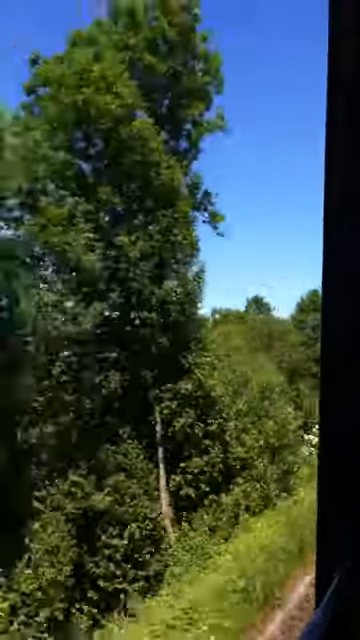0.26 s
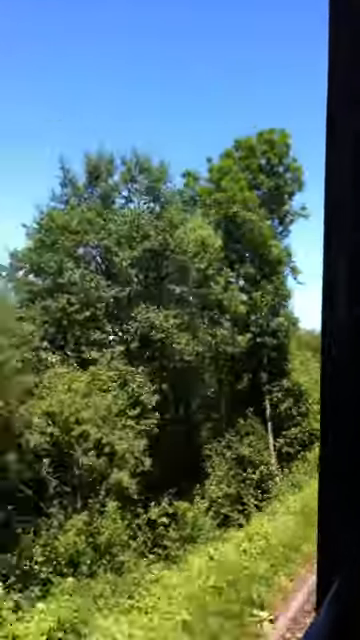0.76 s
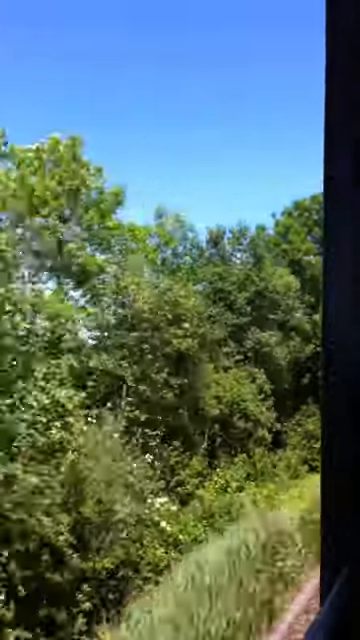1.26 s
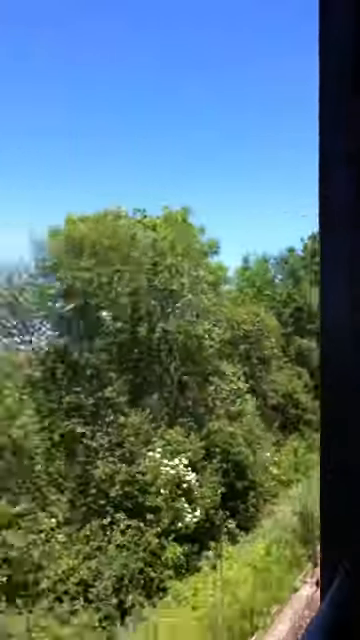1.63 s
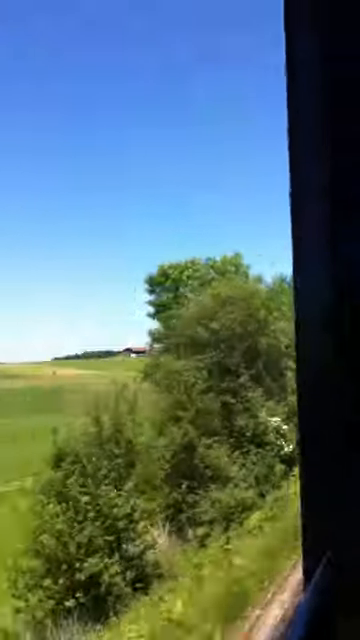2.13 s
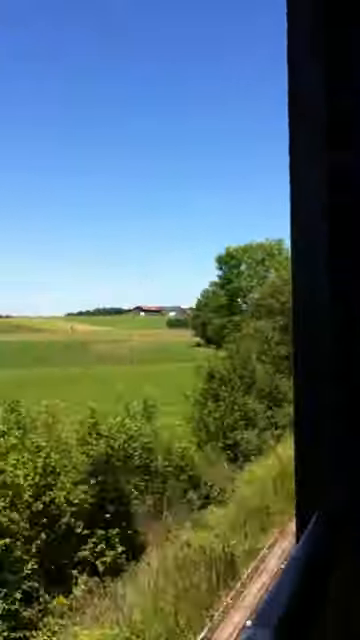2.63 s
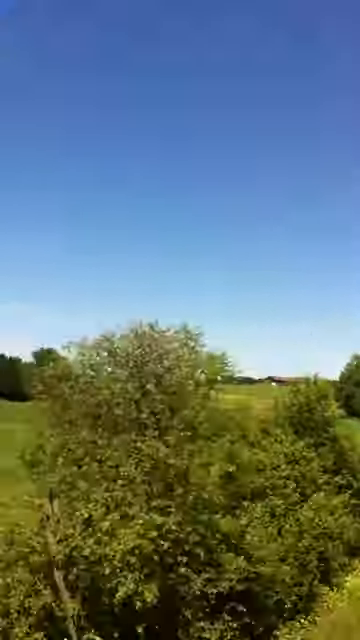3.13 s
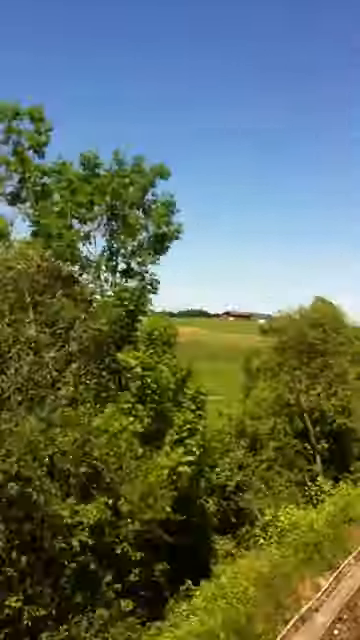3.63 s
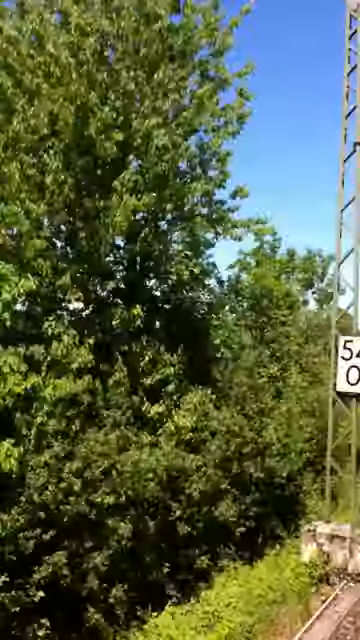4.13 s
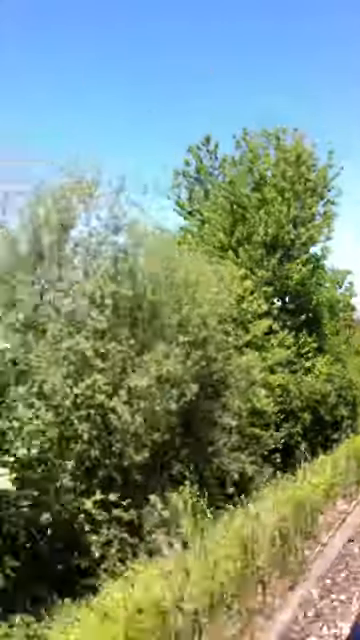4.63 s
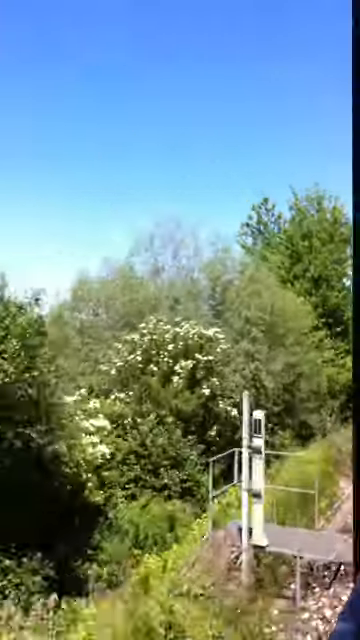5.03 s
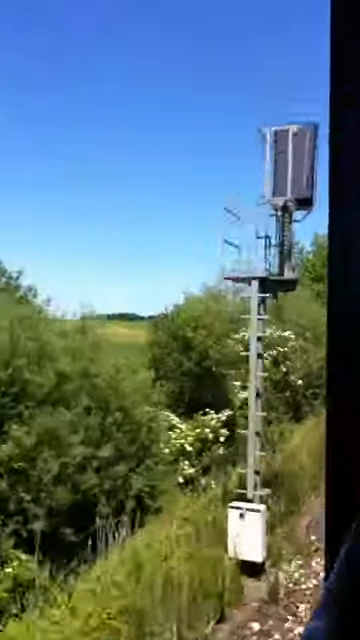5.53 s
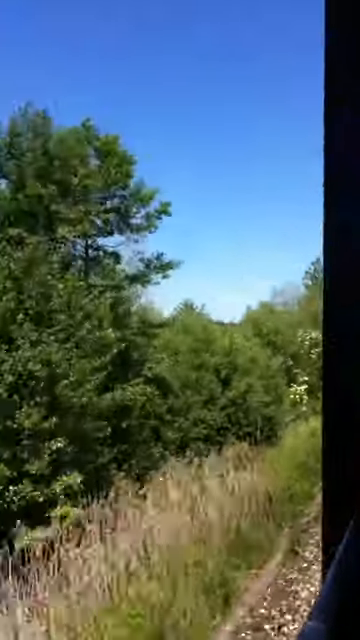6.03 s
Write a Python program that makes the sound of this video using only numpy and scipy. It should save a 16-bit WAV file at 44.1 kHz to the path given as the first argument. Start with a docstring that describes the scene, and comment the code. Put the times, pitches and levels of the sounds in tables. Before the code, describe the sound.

Wind hisses past the open window of a moving train while the wheels rumble continuously underneath. An early gust overloads the phone microphone with a sharp pop, and the sound dips briefly. The wind eases to scattered soft thumps, then returns in the second half with frequent irregular buffeting and short crackles that last to the end.

```python
"""Wind at an open train window

Wheels roar on the rails and the slipstream hisses past a phone at the window of a running train.
Eddies strike the microphone port as puffs and thumps; the hardest overload it and crackle,
and the phone's gain control ducks after them and creeps back."""
import sys
import numpy as np
from scipy import signal
from scipy.fft import rfft, irfft, next_fast_len
from scipy.io import wavfile
from scipy.ndimage import uniform_filter1d, map_coordinates

SR = 44100
rng = np.random.default_rng(int(sys.argv[2]) if len(sys.argv) > 2 else 0)


def waveform_to_disk(signal):
    """Save audio, clipped to [-1, 1], as 16-bit WAV at the path in sys.argv[1]."""
    frames = np.transpose(np.atleast_2d(signal))
    scaled = np.clip(frames, -1, 1) * 32767
    samples = np.round(scaled).astype(np.int16)
    wavfile.write(sys.argv[1], SR, samples)


N = 276948


def amp(db):
    """Amplitude ratio of a level in decibels."""
    return 10 ** (np.asarray(db) / 20)


def unit(x):
    """Normalisation to rms 1."""
    return x / np.sqrt(np.mean(x ** 2) + 1e-20)


def along(points, hz):
    """Interpolation of (frequency, value) points on a logarithmic frequency axis."""
    f, v = np.transpose(points)
    return np.interp(np.log(hz + 1), np.log(f + 1), v)


def curves(rows):
    """Linear interpolation of each column after the time, one value per sample."""
    times, *columns = np.transpose(rows)
    return [np.interp(np.arange(N) / SR, times, column) for column in columns]


def wobble(rate):
    """Smooth random modulation: a spline through `rate` Gaussian knots a second."""
    return map_coordinates(rng.standard_normal(int(N * rate / SR) + 4), [np.arange(N) * rate / SR])


def filtered(x, response):
    """Linear filtering: the spectrum of x times a frequency response."""
    size = next_fast_len(2 * len(x))
    return irfft(rfft(x, size) * response(np.fft.rfftfreq(size, 1 / SR)), size)[:len(x)]


def rush(spectrum, patchy_db):
    """Coloured noise of rms 1, modulated in random patches of time and frequency."""
    z = signal.stft(rng.standard_normal(N), nperseg=512)[2]
    patches = uniform_filter1d(rng.standard_normal(z.shape), size=5, axis=0)
    patches = uniform_filter1d(patches, size=12, axis=1)
    patchy = signal.istft(z * amp(patchy_db * unit(patches)), nperseg=512)[1][:N]
    return unit(filtered(patchy, lambda hz: amp(along(spectrum, hz))))


def wheels(level_db):
    """Rolling noise: rough steel on steel excites rail and wheel resonances that waver, come and go."""
    # Spectrum of the roar: (frequency [Hz], relative level [dB])
    roar_spectrum = [(30, -47), (100, -4.5), (200, -2), (350, -2), (600, -2), (850, -5.5), (1200, -7),
                     (1500, -11.5), (2000, -12.5), (2700, -20), (4000, -21), (8000, -40), (16000, -51)]
    # Resonances: (frequency [Hz], bandwidth [Hz], lift [dB], time of maximum [s], duration [s])
    resonances = [(506, 37, 4, 2.6, 7), (967, 100, 5.5, 4.74, 3.6), (934, 78, 3, 1.5, 7.6),
                  (1067, 75, 7.5, 0.65, 9.8), (1450, 110, 5, 3, 14), (1840, 330, 5, 3, 3),
                  (3440, 40, 8, 2.8, 5.3), (3590, 41, 10, .3, 2.2)]
    wander, flutter = 0.0092, 0.26  # fractions of each resonance's frequency and lift
    f, t, z = signal.stft(rush(roar_spectrum, patchy_db=1.0), SR, nperseg=2048)
    waver = lambda: np.interp(t, np.arange(N) / SR, wobble(rate=7))
    lift_db = 0
    for hz, width, db, peak_s, duration in resonances:
        detune = f[:, None] - hz * (1 + wander * waver())
        strength_db = db * np.exp(-(2 * (t - peak_s) / duration) ** 2) * (1 + flutter * waver())
        lift_db = lift_db + strength_db / (1 + (2 * detune / width) ** 2)
    roar = signal.istft(z * amp(lift_db), SR, nperseg=2048)[1][:N]
    unevenness_db = 0.6 * wobble(rate=14)
    return amp(level_db + 1.21 + unevenness_db) * unit(roar)


def slipstream(buffet_db, hiss_db, brightness_db):
    """Flow noise: turbulence rumbles in lumps on the port and hisses along the window frame."""
    # Spectra of the rumble and the hiss: (frequency [Hz], relative level [dB])
    rumble_spectrum = [(20, -36), (45, -9), (80, -1.5), (120, -1.5), (170, 2), (260, -8.5), (450, -14.5),
                       (1000, -23), (3000, -77)]
    hiss_spectrum = [(500, 0), (2000, -16), (3500, 0.5), (5000, 2.5), (7000, -2), (10000, -7.5),
                     (13000, -12.5), (16000, -17)]
    split_hz = 9200  # brightness lifts the hiss above this and lowers it below
    lumps = 0.88 * wobble(rate=12) + wobble(rate=55)
    rumble = amp(buffet_db + 3.6 * lumps) * rush(rumble_spectrum, patchy_db=-0.5)
    hiss = amp(hiss_db + 1.0 + 0.48 * lumps) * rush(hiss_spectrum, patchy_db=1.5)
    treble = filtered(hiss, lambda f: f ** 4 / (f ** 4 + split_hz ** 4))
    return rumble + amp(-brightness_db) * (hiss - treble) + amp(brightness_db) * treble


def swish():
    """Band-limited noise under a Gaussian envelope: one brief, faint swish in the hiss."""
    # Pass band: (frequency [Hz], relative level [dB])
    band = [(3000, -25), (4500, -1), (6200, -3), (7500, -28)]
    t = np.arange(N) / SR - 2.6
    return amp(-44.0) * np.exp(-(t / 0.018) ** 2) * rush(band, patchy_db=7.0)


def port(pressure, corner_hz, damping):
    """The microphone's bass roll-off, a second-order high-pass: a push swings back and rings briefly."""
    response = lambda f: -f * f / (corner_hz ** 2 - f * f + 1j * damping * corner_hz * f)
    return filtered(pressure, response)


def swell(t, decay_s, rise):
    """Exponential growth and decay about t = 0; the growth's time constant is rise * decay_s."""
    u = np.clip(t / decay_s, -12, 30)
    return 1 / (np.exp(-u / rise) + np.exp(u))


def bursts(rows, shape):
    """Superposition of transients: a new burst of the given shape at each row's time and peak level."""
    size = SR // 8
    t = (np.arange(size) - size // 2) / SR
    out = np.zeros(N + 2 * size)
    for (time_s, peak_db, decay_s, hz), noises in zip(rows, rng.standard_normal((len(rows), 2, size))):
        burst = shape(noises, t, decay_s, hz)
        out[round(time_s * SR):][:size] += amp(peak_db) * burst / np.abs(burst).max()
    return out[size // 2:][:N]


def eddy(noises, t, decay_s, swirl_hz):
    """Vortex pressure at the port: a few uneven swings with turbulence riding on them."""
    drift = unit(filtered(noises[0], lambda f: np.exp(-(f / (1.462 * swirl_hz)) ** 2)))
    swings = np.sin(2 * np.pi * np.cumsum(swirl_hz * (1 + 0.3514 * drift)) / SR)
    turbulence = unit(filtered(noises[1], lambda f: 1 / np.sqrt(1 + (f / (2.11 * swirl_hz)) ** 4.94)))
    push = (swings + 0.42 * turbulence) * swell(t, decay_s, rise=0.45)
    return port(push, corner_hz=127.5, damping=0.68)


def puffs(buffet_db):
    """Intermittent turbulence: weak eddies arrive at random, their level following the buffeting."""
    per_second, decay_s = 9, 0.0048
    above_buffet_db, spread_db, spread_octaves = 11, 3.5, 0.4
    count = int(per_second * N / SR)
    at = rng.integers(N, size=count)
    strength, spin = rng.standard_normal((count, 2)).T
    peak_db = buffet_db[at] + above_buffet_db + spread_db * strength
    swirl_hz = 180.3 * 2 ** (spread_octaves * spin)
    return bursts(np.column_stack([at / SR, peak_db, np.full(count, decay_s), swirl_hz]), eddy)


def thumps():
    """Vortex impingement: strong eddies strike the port as low pressure pulses."""
    # Strong eddies: (time [s], peak level [dB], decay time [s], swirl rate [Hz])
    gusts = [(0.055, -28, 0.0046, 149.4), (0.122, -20, 0.0059, 168), (0.28, -14, 0.0049, 247.3),
             (0.42, -22, 0.0071, 191), (0.482, -15.5, 0.0027, 191.3), (0.56, -14.5, 0.0036, 170.5),
             (0.703, -16, 0.0034, 255), (0.732, 5, 0.0052, 293.1), (0.739, 12.5, 0.0041, 330),
             (1.085, -17, 0.0053, 236), (1.158, -10.5, 0.0056, 227.2), (1.4, -13, 0.0028, 210.7),
             (1.88, -28, 0.0079, 198), (2.525, -13.5, 0.0036, 223), (2.548, -14.5, 0.0055, 281.5),
             (2.642, -14.5, 0.0025, 153.5), (3.167, -14, 0.0036, 515), (3.172, -20, 0.0054, 126.4),
             (3.3, -20, 0.0025, 206.4), (3.3955, -6.5, 0.0075, 139.6), (3.4305, -3, 0.00056, 454),
             (3.4375, -3, 0.0015, 340.5), (3.491, -19, 0.0023, 156), (3.547, -14.5, 0.0064, 166.8),
             (3.574, -10.5, 0.0031, 190.8), (3.657, -0.5, 0.0013, 218), (3.679, -12.5, 0.0037, 179),
             (3.742, -15, 0.0047, 171), (3.789, -14, 0.0015, 259.4), (3.847, -13.5, 0.0047, 349),
             (3.877, -9.5, 0.0048, 218.6), (3.9215, -2.5, 0.0031, 163.6), (3.934, -11, 0.0043, 218),
             (3.967, -4, 0.0027, 218), (4.003, -16, 0.0044, 239), (4.046, -14.5, 0.0052, 197.5),
             (4.083, -9, 0.0029, 199.7), (4.092, -14, 0.0028, 226), (4.362, -19, 0.0034, 170),
             (4.397, -10, 0.0032, 384), (4.455, -18, 0.014, 417), (4.516, -1, 0.0063, 149),
             (4.613, -12.5, 0.0052, 202.6), (4.6615, -0.5, 0.0033, 280.2), (4.674, -6.5, 0.0047, 180.6),
             (4.822, -17, 0.0033, 172), (4.875, -10, 0.004, 235), (4.949, -6, 0.0019, 157),
             (4.976, -7.5, 0.0065, 200.2), (4.996, -9, 0.0043, 190), (5.04, -18, 0.0031, 179),
             (5.074, -8.5, 0.0043, 177.6), (5.342, -15, 0.004, 173.5), (5.399, -15, 0.0032, 180),
             (5.427, -13, 0.0049, 177.7), (5.46, -16, 0.0027, 322), (5.5315, 2, .003, 328.6),
             (5.549, -4, 0.0053, 296), (5.705, -16, 0.003, 238), (5.747, -16, 0.0025, 173.5),
             (5.769, -11.5, 0.0022, 338), (5.8325, 1.5, 0.0039, 189.5), (5.8405, 4, 0.003, 210.9),
             (5.884, -12, 0.009, 508.4), (5.906, -7, 0.0029, 224), (6.004, -9.5, .0046, 151),
             (6.053, -12.5, 0.0028, 173.4), (6.0635, 1, 0.0034, 421.4), (6.073, -2.5, 0.0022, 231),
             (6.12, 5.5, 0.0033, 438.5), (6.155, -11, 0.0039, 175.6)]
    return bursts(gusts, eddy)


def tear(noises, t, decay_s, top_hz):
    """Flow separation and reattachment chop noise into snaps; the cavity behind the port resonates."""
    flap_hz, flap_depth = 407, 0.71
    cavity_hz, cavity_width_hz, cavity_db = 2710, 890, 5
    flapping = 1 + flap_depth * np.cos(2 * np.pi * flap_hz * t)
    ragged = np.sign(noises[0]) * np.abs(noises[1]) ** 1.03
    snaps = ragged * flapping * swell(t, decay_s, rise=0.37)
    # The spectrum falls gently towards top_hz and steeply above it.
    colour = lambda f: 1 / np.sqrt((1 + (f / (0.28 * top_hz)) ** 2) * (1 + (f / top_hz) ** 10))
    cavity = lambda f: amp(cavity_db / (1 + (2 * (f - cavity_hz) / cavity_width_hz) ** 2))
    return filtered(port(snaps, corner_hz=668, damping=0.63), lambda f: colour(f) * cavity(f))


def crackles():
    """Edge separation noise: pops and crackles where the hardest eddies tear off the rim of the port."""
    # Separations: (time [s], peak level [dB], decay time [s], top frequency [Hz])
    separations = [(0.7415, 9.5, 0.0017, 3050), (3.4297, -8.5, 0.00062, 9300), (3.4312, -11, 0.00076, 1200),
                   (3.4372, -14, 0.00089, 3000), (3.654, -8, 0.0054, 1910), (3.9203, -14, 0.00085, 5200),
                   (3.9218, -5, 0.0015, 1080), (3.965, -7, 0.0038, 1150), (4.528, -15, 0.0036, 900),
                   (4.666, 1, 0.0021, 1510), (5.5295, -7, .001, 1500), (5.535, 0.5, 0.0028, 4050),
                   (5.8398, -1, 0.0017, 1950), (5.884, -11, .003, 1300), (6.0613, -1, 0.002, 4560),
                   (6.0642, -2, .0018, 1100), (6.0673, -4, 0.0016, 3860), (6.12, -5, 0.0013, 2200)]
    return bursts(separations, tear)


def scene():
    """Superposition of thumps, crackles and puffs on the running noise of the train."""
    # Buffeting of the port by the air: (time [s], level [dB])
    buffeting = [(0, -44), (0.9, -42), (1.15, -29.5), (1.5, -55), (1.9, -40.5), (2.25, -52), (2.55, -41),
                 (3.05, -48), (3.5, -34), (4.05, -39), (4.2, -49), (4.45, -31), (4.75, -47), (5.0, -31),
                 (5.2, -36), (5.45, -32), (5.62, -39), (5.95, -28.5), (6.28, -29.5)]
    # Running noise: (time [s], roar base level [dB], hiss base level [dB], hiss brightness [dB])
    running = [(0, -30, -48, 3.5), (0.7, -29.5, -47, 2.5), (0.85, -29.5, -45.5, 5), (1.2, -30.5, -46, 3),
               (1.65, -32.5, -54.5, 8), (1.95, -33, -50.5, -1.5), (2.3, -32, -52, -1),
               (3.42, -30.5, -43, 2), (3.6, -33, -47.5, 2), (3.85, -28.5, -41, 3),
               (4.35, -30.5, -45.5, 0.5), (4.75, -25.5, -42.5, -0.5), (5.0, -27, -45.5, 4.5),
               (5.3, -28.5, -45, 3.5), (5.62, -30, -49, 6), (6.0, -30.5, -47, 2), (6.28, -29.5, -51, 7)]
    buffet_db, = curves(buffeting)
    roar_db, hiss_db, brightness_db = curves(running)
    blows = thumps() + crackles() + puffs(buffet_db)
    return (blows + wheels(roar_db) + slipstream(buffet_db, hiss_db, brightness_db) + swish())[None]


def gain_control(x, ceiling_db, attack_s, release_s):
    """Peak limiting: peaks over the ceiling pull the gain down quickly; it recovers slowly."""
    excess_db = np.maximum(20 * np.log10(np.abs(x) + 1e-9) - ceiling_db, 0)
    growth = np.exp(np.arange(N) / SR / release_s)
    held_db = np.maximum.accumulate(excess_db * growth) / growth  # peak hold with exponential decay
    return x * amp(-uniform_filter1d(held_db, max(int(attack_s * SR), 1)))


def record(dry):
    """The phone's gain control, soft saturation of the peaks that slip through, and band limiting."""
    saturation, low_hz, top_hz = 0.78, 22, 15790
    x = gain_control(dry[0], ceiling_db=-4.0, attack_s=0.0053, release_s=0.45)
    x = x / (1 + np.abs(x / saturation) ** 8) ** (1 / 8)
    x = filtered(x, lambda f: f / np.hypot(f, low_hz))
    return filtered(x, lambda f: f < top_hz)[None]


dry = scene()
out = record(dry)
waveform_to_disk(out)
```